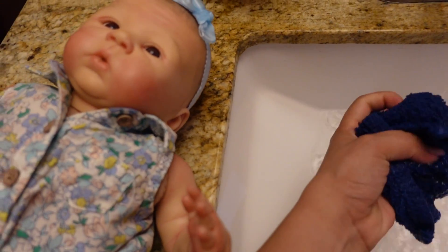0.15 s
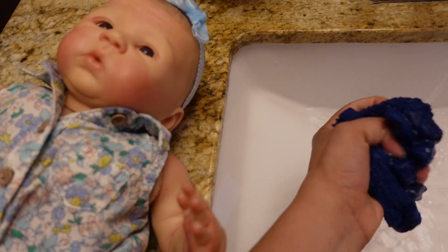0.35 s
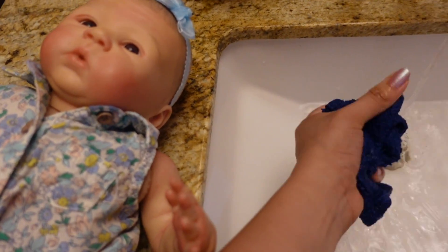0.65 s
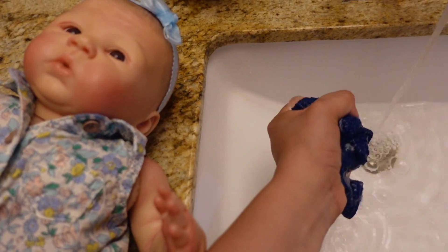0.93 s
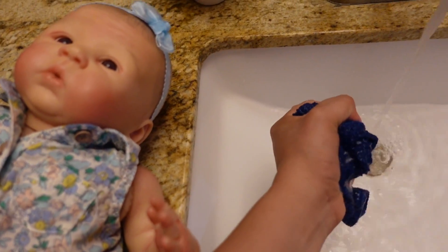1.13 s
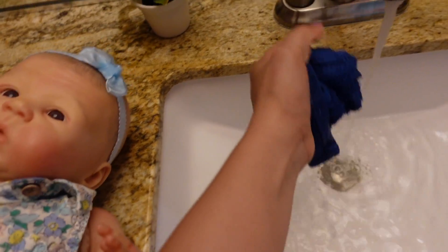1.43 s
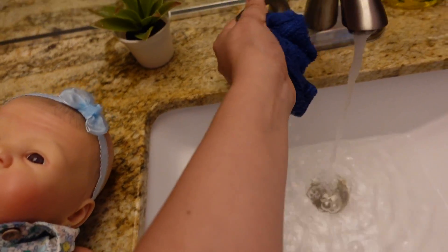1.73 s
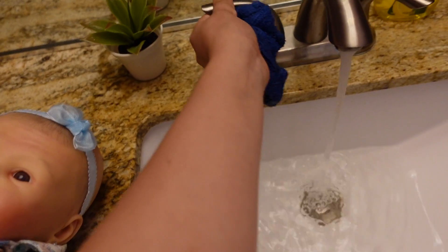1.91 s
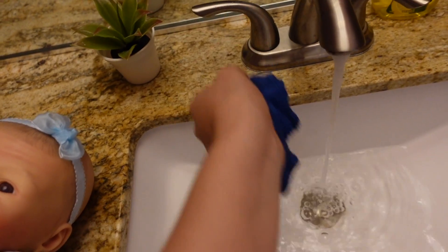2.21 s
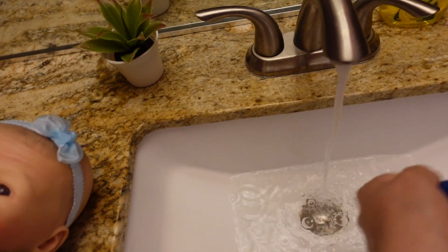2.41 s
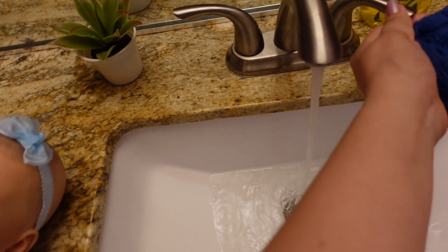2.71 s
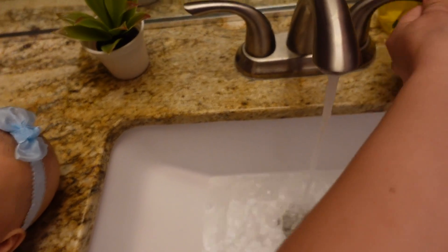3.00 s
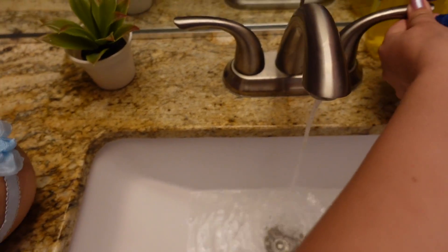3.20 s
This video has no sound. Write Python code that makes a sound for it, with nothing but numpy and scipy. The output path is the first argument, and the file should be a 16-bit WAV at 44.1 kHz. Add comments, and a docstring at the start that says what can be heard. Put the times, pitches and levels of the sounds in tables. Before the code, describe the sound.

Running tap water splashes and fizzes in a small basin, with sharp drips, plips and drain gulps

```python
"""A faucet stream falls into a shallow pool in a ceramic sink: lumpy noise of spatter, fizz and low splashing.
Damped sines make its bubbles, short noise bursts its slaps, as a cloth is wetted at the edge of the stream.
Knocks and gulps of air ring the drain. The spatter breaks off briefly after 1 s; near the end the tap is
turned down, the top treble fades and the spatter sinks, then returns in the last tenth of a second.
Filtered noise makes a faint hum and room air; a dense echo makes the small hard room."""
import sys
import numpy as np
from scipy import signal
from scipy.fft import rfft, irfft
from scipy.io import wavfile
from scipy.ndimage import map_coordinates

SR = 44100
rng = np.random.default_rng(int(sys.argv[2]) if len(sys.argv) > 2 else 0)


def to_wav(sig):
    """Store sig (one row per channel, or 1-D mono) as 16-bit WAV at the path in sys.argv[1].

    Samples outside -1..1 are clipped; the rate is SR.
    """
    pcm = np.clip(np.atleast_2d(sig), -1, 1) * 32767
    pcm = np.round(pcm).astype(np.int16)
    wavfile.write(sys.argv[1], SR, pcm.T)  # frames by channels


N = 147735


def undb(db):
    """Decibels to gain."""
    return 10 ** (np.asarray(db) / 20)


def level(x, db):
    """Set the rms level."""
    return x * undb(db) / np.sqrt(np.mean(x ** 2))


def curve(table, axis=1):
    """One column of a time table, per sample."""
    rows = np.array(table)
    return np.interp(np.arange(N) / SR, rows[:, 0], rows[:, axis])


def frequencies():
    """Spectrum bins in Hz, kept above zero."""
    return np.maximum(np.fft.rfftfreq(N, 1 / SR), 1)


def colour(x, points):
    """Filter by a (Hz, dB) outline, interpolated over log frequency."""
    hz, db = np.array(points).T
    gain = undb(np.interp(np.log(frequencies()), np.log(hz), db))
    return irfft(rfft(x) * gain, N)


def resonate(x, hz, width_hz):
    """Two-pole resonance, gain 1 at the centre."""
    b, a = signal.iirpeak(hz, hz / min(width_hz, SR / 4), fs=SR)
    return signal.lfilter(b, a, x)


def add(out, start_s, sound):
    """Mix a sound in at a time."""
    i = int(np.clip(start_s * SR, 0, N - 1))
    out[i:i + len(sound)] += sound[:N - i]


def burst(rise_s, decay_s):
    """Times and envelope of a quick rise and an exponential fall."""
    t = np.arange(int(SR * min(7 * decay_s, 1))) / SR
    return t, (1 - np.exp(-t / rise_s)) * np.exp(-t / decay_s)


def bubble(hz, rise_s, decay_s, octaves_per_s):
    """Damped sine; its pitch climbs as the bubble nears the surface."""
    t, env = burst(rise_s, decay_s)
    pitch_hz = np.minimum(hz * 2 ** (octaves_per_s * t), SR / 2)
    return env * np.sin(2 * np.pi * np.cumsum(pitch_hz) / SR)


# Outline of the room air. Each row: frequency in Hz, gain in dB.
AIR_OUTLINE = [(20, -23), (42, -13), (56, -2), (72, -4), (100, 4.5), (145, 2.5), (200, -0.5), (400, -2.5),
               (2000, -35)]
AIR_DB, AIR_SIDE_DB = -61, -19  # side is relative to mid
HUM_HZ, HUM_WIDTH_HZ, HUM_DB = 122.5, 10.6, -59


def background():
    """Wavering hum (narrow-band noise) over faint room air, a little different at each ear."""
    def air():
        """One draw of hum and air."""
        hum = resonate(rng.standard_normal(N), HUM_HZ, HUM_WIDTH_HZ)
        hum = resonate(hum, HUM_HZ, 2 * HUM_WIDTH_HZ)
        hiss = colour(rng.standard_normal(N), AIR_OUTLINE)
        return level(hum, HUM_DB) + level(hiss, AIR_DB)
    return air() + undb(AIR_SIDE_DB) * air() * np.array([[1], [-1]])


ROOM_T60_S, SIDE_HZ, SIDE_GAIN = 0.49, 690, 0.55


def reflections(x):
    """Dense fading echo of the room, alike left and right in the bass."""
    t = np.arange(SR // 2) / SR
    fade = undb(-60 * t / ROOM_T60_S) * (t > .0007)
    mid, side = rng.standard_normal((2, len(t))) * fade
    side = SIDE_GAIN * signal.lfilter(*signal.butter(1, SIDE_HZ, "high", fs=SR), side)
    response = np.array([mid + side, mid - side]) / np.sqrt(np.sum(mid ** 2))
    return signal.fftconvolve(x[None], response, axes=1)[:, :N]


# Resonances of the basin. Each row: frequency in Hz, width in Hz, gain in dB.
BASIN_MODES = [(513, 10, -28), (739, 16, 0.5), (1018, 18, -3.5), (1694, 230, -10), (2310, 23, -35)]


def ring_basin(running):
    """The ceramic rings along with the running water."""
    return running + sum(undb(db) * resonate(running, hz, width_hz) for hz, width_hz, db in BASIN_MODES)


def low_cut(x):
    """The small basin radiates little bass: steep fall below 320 Hz."""
    return signal.sosfilt(signal.butter(4, 320, "high", fs=SR, output="sos"), x)


# Place of the water. Each row: time in seconds, left minus right in dB.
PLACE = [(0, -2), (1.5, -1.5), (3.35, -0.5)]


def pan(x):
    """Level difference between the ears."""
    pan_db = curve(PLACE)
    return x * undb(np.array([pan_db, -pan_db]) / 2)


LUMP_HZ, LUMP_JITTER, LUMP_SPREAD_DB = 48.03, .3, 2.5  # 1 / median gap; log spread of the gaps
LUMP_RISE_S, LUMP_FALL_S = .003, .005


def lumps():
    """Force of the stream on the pool: a loose train of short uneven surges."""
    jitter, size = rng.standard_normal((N // 200, 2)).T
    starts_s = np.cumsum(np.exp(LUMP_JITTER * jitter)) / LUMP_HZ
    sizes_db = LUMP_SPREAD_DB * np.clip(size, -2, 1)
    force, env = np.zeros(N), burst(LUMP_RISE_S, LUMP_FALL_S)[1]
    for start_s, db in zip(starts_s, sizes_db):
        add(force, start_s, undb(db) * env)
    return level(force, 0)


DROPLETS_PER_S = 7000


def droplets():
    """Dense tiny impacts of equal size and random sign."""
    hit = rng.random(N) < DROPLETS_PER_S / SR
    return hit * np.sign(rng.standard_normal(N))


DRAIN_WANDER, WANDER_PER_S = 0.0057, 18.5  # rms share of the pitch, rate


def wander(x):
    """The water level in the drain bobs and bends its pitch at random."""
    bend = level(resonate(rng.standard_normal(N), WANDER_PER_S, WANDER_PER_S), 0) * DRAIN_WANDER
    return map_coordinates(x, [np.arange(N) + np.cumsum(bend)], mode="nearest")


# Resonances of the drain's hollow. Each row: frequency in Hz, T60 in seconds, gain in dB.
DRAIN_MODES = [(287, 0.094, -10), (359.3, 0.32, -7.5), (377, 0.21, -8.5), (438.6, 0.42, 3),
               (441, 0.52, -24), (529, 0.084, -18)]


def ring_drain(x):
    """Ring the hollow of the drain."""
    out = np.zeros(N)
    for hz, t60_s, db in DRAIN_MODES:
        width_hz = np.log(1000) / np.pi / t60_s
        out += undb(db) * resonate(x, hz, width_hz)
    return out


# Gulps of air. Each row: start in seconds, level in dB, starting pitch in Hz, decay in seconds.
AIR_GULPS = [(0.169, -30, 373, 0.016), (.226, -21.5, 383, 0.01), (0.259, -21, 458, 0.0095),
             (0.28, -19.5, 508, 0.0094), (0.411, -29, 400, .011), (0.431, -22.5, 424, 0.012),
             (.599, -21, 492, .011), (.74, -31.5, 430, 0.0065), (.788, -20, 384.5, 0.012),
             (.862, -26.5, 384, 0.017), (0.953, -22, 397, 0.0082), (.985, -25.5, 375, 0.0052),
             (1.113, -27, 423, 0.026), (1.148, -19.5, 355, 0.0099), (1.24, -26, 430, 0.016),
             (1.286, -27, 426, 0.019), (1.384, -27.5, 390, 0.0079), (1.518, -26.5, 356, 0.018),
             (1.584, -25.5, 411.6, 0.0095), (1.97, -28, 483, .01), (1.99, -23.5, 512, 0.0069),
             (2.028, -27, 354, 0.017), (2.059, -23.5, 369, 0.012), (2.106, -24, 417, 0.0087),
             (2.264, -26.5, 432.4, 0.029), (2.352, -28, 440, 0.01), (2.479, -25, 421.3, 0.016),
             (2.7198, -11.5, 383, .006), (2.731, -17, 374, 0.012), (2.762, -14.5, 433, 0.017),
             (2.791, -27.5, 444, 0.0054), (3.065, -17.5, 427, 0.006), (3.19, -20.5, 473, 0.0075),
             (3.241, -19, 405, 0.0033), (3.254, -22, 410, 0.0035)]
# How hard the stream rings the drain. Each row: time in seconds, gain in dB.
DRAIN_DRIVE_CURVE = [(0, -2), (.3, 5), (.55, -4), (.85, 0.5), (1.3, -1.5), (1.5, -8.5), (1.85, 0),
                     (2.2, -1.5), (2.5, 8), (2.85, 12), (3.0, -1), (3.35, 2)]
DRAIN_DB = -38  # before the drive curve
KNOCKS_PER_S, KNOCK_SPREAD_DB = 110, 4.5
GULP_RISE_S, GULP_OCTAVES_PER_S, GULP_RING_GAIN = 0.00085, 2.7, 2.27


def drain(force):
    """Small knocks of the stream keep the drain's hollow ringing; gulps of air ring it too."""
    gulps = np.zeros(N)
    for start_s, db, hz, decay_s in AIR_GULPS:
        add(gulps, start_s, undb(db) * bubble(hz, GULP_RISE_S, decay_s, GULP_OCTAVES_PER_S))
    hit = rng.random(N) < KNOCKS_PER_S / SR * force / force.mean()
    knocks = hit * undb(KNOCK_SPREAD_DB * rng.standard_normal(N))
    steady = level(ring_drain(colour(knocks, SPLASH_OUTLINE)), DRAIN_DB)
    steady = steady * undb(curve(DRAIN_DRIVE_CURVE))
    return wander(steady) + gulps + GULP_RING_GAIN * ring_drain(gulps)


# Slaps and sloshes. Each row: start in seconds, level in dB, centre in Hz, decay in seconds.
WATER_SLAPS = [(0.2037, -9.5, 4430, 0.0017), (0.258, -15.5, 1260, 0.0036), (.295, -30, 980, 0.024),
               (.36, -16, 2000, 0.0034), (0.366, -20.5, 4100, 0.0027), (0.477, -23, 2200, 0.0074),
               (0.5548, -18, 5170, 0.006), (0.6, -30.5, 560, 0.016), (0.6, -13, 3940, 0.0032),
               (0.618, -13.5, 8050, 0.0024), (0.3005, -19, 9100, 0.0022), (2.871, -21, 2400, .004),
               (3.278, -24, 5000, .002), (.658, -31.5, 870, 0.045), (.666, -21.5, 3100, 0.0044),
               (0.794, -21.5, 1850, 0.0068), (.9535, -13, 6160, 0.0018), (0.9536, -23, 1410, 0.0022),
               (1.129, -16, 4400, 0.004), (1.153, -17.5, 1840, 0.0032), (1.171, -20.5, 7000, 0.0036),
               (1.26, -18, 4290, 0.0043), (1.656, -18, 13000, .0015), (1.516, -26, 900, 0.0055),
               (1.514, -25, 7200, 0.0083), (1.541, -20, 4500, 0.0036), (1.583, -24, 630, 0.0065),
               (1.5852, -15.5, 3430, 0.0039), (1.604, -18.5, 4220, 0.0046), (1.815, -19.5, 3850, 0.0019),
               (1.89, -13, 5460, 0.0037), (1.9916, -13, 8400, 0.0018), (2.0573, -16.5, 4450, 0.0041),
               (2.128, -36.5, 1140, 0.035), (2.196, -16.5, 3520, 0.0031), (2.304, -28.5, 650, 0.0083),
               (2.512, -17, 7700, 0.0026), (2.675, -24.5, 4700, 0.0042), (2.674, -19, 2100, 0.0046),
               (2.72, -30, 573, 0.0095), (2.735, -31, 650, 0.0033), (2.721, -23, 3020, .009),
               (2.748, -46, 660, 0.026), (2.82, -26, 9100, .002), (3.067, -17.5, 7200, .0035),
               (3.069, -18.5, 2340, 0.0054), (3.125, -21.5, 7950, 0.0028), (3.155, -18.5, 6340, 0.0038),
               (3.1898, -20, 6100, 0.004), (3.189, -27, 2300, .003), (3.294, -25, 6300, 0.0075),
               (3.299, -36, 900, 0.018), (3.341, -19.5, 3780, 0.0018)]
SLAP_WIDTH, SLAP_RISE_S = 0.99, 0.00046  # width as a share of the centre
SLAP_GRAIN_DB, CONTACT_GAIN = 8, 0.51


def slaps():
    """Heavier drops crack on wet ceramic or slosh in the pool: sharp contact plus grainy noise burst."""
    out = np.zeros(N)
    for start_s, db, hz, decay_s in WATER_SLAPS:
        def tone(x):
            """Band of this slap."""
            return resonate(resonate(x, hz, hz * SLAP_WIDTH), hz, 2 * hz * SLAP_WIDTH)
        env = burst(SLAP_RISE_S, decay_s)[1]
        sign, size = rng.standard_normal((2, SR))
        grains = np.sign(sign) * undb(SLAP_GRAIN_DB * size)
        splash = env * level(tone(grains), 0)[:len(env)]
        contact = tone(signal.unit_impulse(len(env)))
        contact = CONTACT_GAIN * contact / np.abs(contact).max()
        add(out, start_s, undb(db) * (splash + contact))
    return out


# Each row: start in seconds, starting pitch in Hz, level in dB before BUBBLE_TRIM_DB,
# decay in seconds, rise in octaves per second.
LARGE_BUBBLES = [(.001, 593, -16.5, 0.012, 14.5), (0.06, 1086, -25, 0.012, 35.5),
                 (0.162, 1155, -9, 0.0084, 8.5), (.203, 3400, -21, 0.0037, 1),
                 (.359, 1280, -12, 0.0088, 19), (.362, 2130, -12, 0.0027, 18),
                 (.365, 4360, -10, 0.0027, 22), (0.489, 1296, -20.5, 0.0096, 15),
                 (0.575, 1290, -16, 0.0083, 1), (0.584, 2300, -15, 0.0035, 3),
                 (.633, 1830, -16, 0.0051, 16), (.664, 663, -13.5, 0.005, 0),
                 (0.666, 1084, -21, 0.015, 2.5), (0.728, 2200, -12.5, 0.0069, 13),
                 (0.729, 2700, -10, 0.0025, 3), (0.741, 1630, -24, 0.0086, 13),
                 (.954, 1299, -13.5, 0.01, 6.5), (0.965, 2970, -13, 0.0043, 36), (1.01, 9560, -16, .003, 1),
                 (1.082, 3450, -15.5, 0.0034, 16), (1.171, 1154, -12, 0.011, 10.5),
                 (1.2, 1910, -11, 0.0028, 19), (1.096, 2750, -19, .003, 17), (1.2605, 2190, -9, 0.0034, 9),
                 (1.314, 790, -12.5, 0.012, -1), (1.339, 2800, -13, 0.0047, 1.5),
                 (1.349, 764, -17, 0.015, 6), (1.374, 1007, -18.5, 0.012, 5),
                 (1.386, 1240, -22.5, 0.011, 5), (1.41, 808, -17, 0.009, 9), (1.418, 1260, -21, 0.008, 8),
                 (1.585, 1370, -15, 0.007, 18), (1.595, 1880, -14.5, 0.0054, 4),
                 (1.861, 3440, -11, 0.0028, 7), (1.966, 1750, -20.5, .005, -2),
                 (2.098, 690, -27, 0.017, 13.5), (2.128, 865, -23.5, 0.014, 4),
                 (2.141, 1730, -22, 0.0052, 5), (2.195, 2200, -18, 0.0028, 13), (2.263, 956, -23, .008, 9),
                 (2.306, 510, -23, 0.0054, 2), (2.316, 1780, -20, 0.0047, 5),
                 (2.674, 1645, -18.5, 0.0098, 4), (2.681, 2550, -18, 0.0043, 7.5),
                 (2.693, 8950, -11, 0.0021, 3), (2.727, 2270, -13.5, 0.0029, 5),
                 (2.722, 700, -20, 0.0054, 26), (2.753, 693, -16.5, 0.009, 13),
                 (2.822, 1663, -25, 0.015, 1.5), (3.125, 3330, -13, 0.0022, 15),
                 (3.209, 9600, -19, .002, 0), (3.268, 695, -26, 0.024, 12.5), (3.322, 523, -17, 0.011, 5),
                 (3.338, 996, -21.5, 0.011, 27)]
BUBBLE_RISE_S, BUBBLE_TRIM_DB = 0.00056, -2.5
BUBBLE_LIFE = 2.85  # decay times until the burst


def large_bubbles():
    """Plips of larger air pockets: gliding damped sines, cut off as they burst at the surface."""
    out = np.zeros(N)
    for start_s, hz, db, decay_s, octaves_per_s in LARGE_BUBBLES:
        ring = bubble(hz, BUBBLE_RISE_S, decay_s, octaves_per_s)
        age = np.arange(len(ring)) / SR / (BUBBLE_LIFE * decay_s)
        alive = 1 / (1 + age ** 8)
        add(out, start_s, undb(db + BUBBLE_TRIM_DB) * ring * alive)
    return out


MAX_OCTAVES_PER_CYCLE = 0.01306


def swarm(force, per_s, range_hz, cycles, spread_db):
    """Random bubbles, denser in the wake of each lump; few are loud."""
    out, share = np.zeros(N), np.cumsum(force) / np.sum(force)
    low_hz, high_hz = range_hz
    for when, pitch, size, glide in rng.random((int(per_s * N / SR), 4)):
        hz = low_hz * (high_hz / low_hz) ** pitch
        gain = undb(-spread_db * np.log(size + 0.016))
        ring = bubble(hz, 2 / hz, cycles / hz, glide * hz * MAX_OCTAVES_PER_CYCLE)
        add(out, np.searchsorted(share, when) / SR, gain * ring)
    return out


PING_DB, GURGLE_DB = -42, -48.5  # before the flow curves


def tiny_bubbles(force):
    """High pings and lower gurgles of small bubbles in the pool."""
    pings = swarm(force, per_s=270, range_hz=(1765, 14600), cycles=7.7, spread_db=5)
    gurgles = swarm(force, per_s=53, range_hz=(521, 1697), cycles=12, spread_db=1.5)
    pings = level(pings, PING_DB) * undb(curve(FLOW_CURVES, axis=2))
    gurgles = level(gurgles, GURGLE_DB) * undb(curve(FLOW_CURVES, axis=3))
    return pings + gurgles


# Limits of the independently surging bands, in Hz.
SPRAY_BAND_EDGES = [0, 800, 1500, 2600, 4300, 6800, 10500, 22050]
# Width of the spray. Each row: frequency in Hz, side minus mid in dB.
SPRAY_WIDTH = [(300, 7), (1000, -53), (4000, -18.5), (12000, -9)]
SHARED_LUMPS = 0.27  # share of the pulsing common to all bands


def spray(force, steady, outline, db):
    """Stereo droplets; each band follows the stream partly and partly surges by itself."""
    f, spectra = np.fft.rfftfreq(N, 1 / SR), 0
    drops = np.array([droplets(), droplets()])
    for low_hz, high_hz in zip(SPRAY_BAND_EDGES, SPRAY_BAND_EDGES[1:]):
        surge = SHARED_LUMPS * force + (1 - SHARED_LUMPS) * lumps() + steady
        spectra = spectra + rfft(drops * surge) * (f >= low_hz) * (f < high_hz)
    mid, side = (colour(x, outline) for x in irfft(spectra, N))
    side = colour(side, SPRAY_WIDTH)
    return level(np.array([mid + side, mid - side]), db)


# Running water. Each row: time in seconds, gain of the spatter in dB, of the fizz and pings in dB,
# of the low splashing and gurgles in dB.
FLOW_CURVES = [(0, -38, 2.5, 12.5), (.13, 1, 0, -2.5), (.45, -0.5, 1, 0), (.62, 3, 3, 5.5),
               (.9, -2, -0.5, -0.5), (1.07, -37, 0.5, 0), (1.17, 4, 1.5, 6), (1.4, 1, 2, 3.5),
               (1.75, -8.5, -1.5, 2.5), (2.15, 0.5, 0, -0.5), (2.6, 1, -1, -1.5), (2.75, 1.5, 0, -2.5),
               (3.0, 2, -.5, 1.5), (3.09, -5, 0.5, 3.5), (3.15, -18, -7, 1), (3.23, -21, -6, -7.5),
               (3.35, 7.5, -9, 0)]
# Outlines of spatter, fizz and low splashing. Each row: frequency in Hz, gain in dB.
SPATTER_OUTLINE = [(250, -23), (600, 18), (1200, 3), (1750, 22), (2050, -36), (2350, 26), (3300, -19),
                   (4300, 21), (5000, -5), (7500, -4), (10000, -11), (12000, -29), (16000, 11)]
FIZZ_OUTLINE = [(300, -15), (1500, 0), (3000, 3.5), (5000, 1.5), (8000, 1.5), (11000, -1.5), (12500, -4),
                (16000, -2)]
SPLASH_OUTLINE = [(150, -24), (260, -7.5), (340, 5), (520, 4), (650, -17.5), (780, -9), (1100, 5),
                  (1500, -32), (2500, -12), (6000, -45)]
SPATTER_DB, FIZZ_DB, SPLASH_DB = -38, -29.5, -44.5  # before the flow curves
FIZZ_STEADY, BETWEEN_LUMPS = 1, 0.49  # steady force added to the lumps


def stream(force):
    """Spatter, fine fizz and low splashing: droplet noise pulsing with the lumps."""
    spatter = spray(force, BETWEEN_LUMPS, SPATTER_OUTLINE, SPATTER_DB)
    fizz = spray(force, FIZZ_STEADY, FIZZ_OUTLINE, FIZZ_DB)
    splash = level(colour(droplets() * (force + BETWEEN_LUMPS), SPLASH_OUTLINE), SPLASH_DB)
    spatter = spatter * undb(curve(FLOW_CURVES, axis=1))
    fizz = fizz * undb(curve(FLOW_CURVES, axis=2))
    splash = splash * undb(curve(FLOW_CURVES, axis=3))
    return spatter + fizz + splash


CLOSING_S, CLOSED_S, CLOSED_TREBLE_DB, CLOSING_HZ = 2.96, 3.4, -16, 8900  # ramp outlasts the sound


def close_tap(x):
    """A weak stream loses its finest spray: the treble fades as the tap is turned down."""
    treble = irfft(rfft(x) / (1 + (CLOSING_HZ / frequencies()) ** 8), N)
    db = np.interp(np.arange(N) / SR, [CLOSING_S, CLOSED_S], [0, CLOSED_TREBLE_DB])
    return x + (undb(db) - 1) * treble


RUNNING_ROOM_DB, SLAP_ROOM_DB, BUBBLE_ROOM_DB = -11, -3, -11  # sends to the room


def scene():
    """Water in the basin, a little to the right, in a small hard room."""
    force = lumps()
    running = ring_basin(close_tap(stream(force) + tiny_bubbles(force)))
    cracks, plips = slaps(), large_bubbles()
    sent = undb(RUNNING_ROOM_DB) * running.mean(axis=0)
    sent = sent + undb(SLAP_ROOM_DB) * cracks + undb(BUBBLE_ROOM_DB) * plips
    near = running + cracks + plips + reflections(sent)
    return low_cut(pan(near) + drain(force)) + background()


def record(dry):
    """The recorder cuts the top above 15750 Hz."""
    return signal.sosfilt(signal.ellip(10, .2, 70, 15750, fs=SR, output="sos"), dry)


dry = scene()
out = record(dry)
to_wav(out)
```